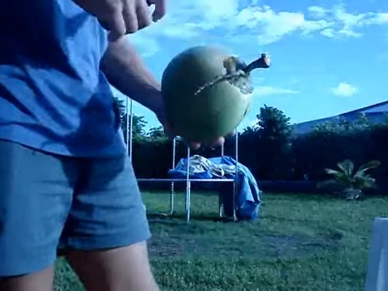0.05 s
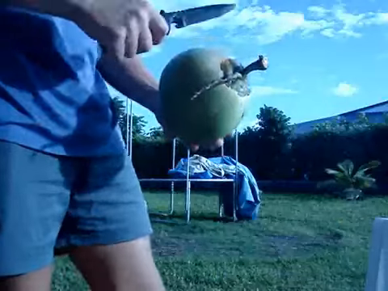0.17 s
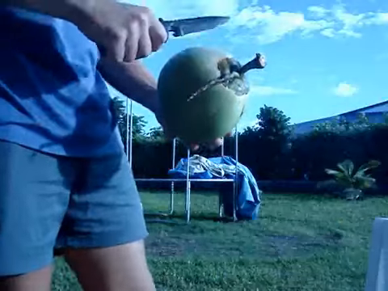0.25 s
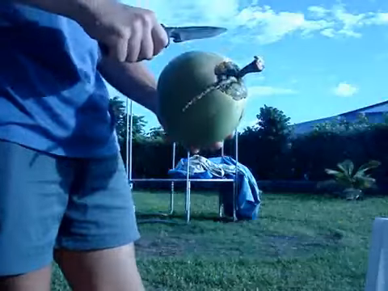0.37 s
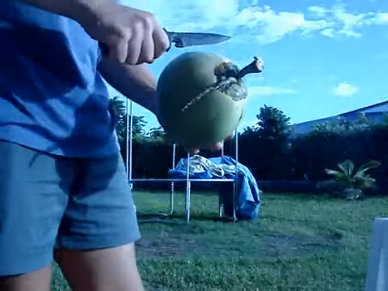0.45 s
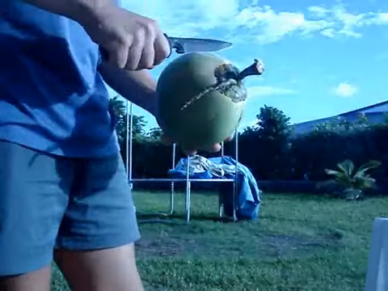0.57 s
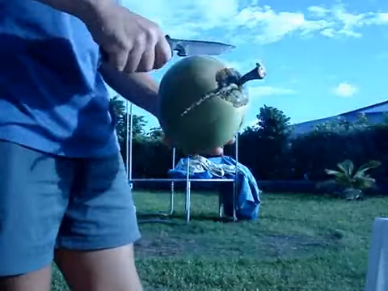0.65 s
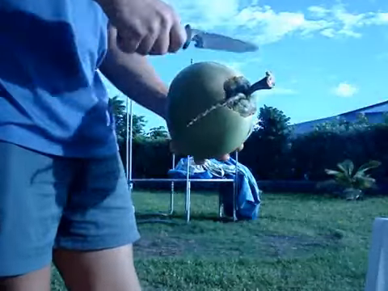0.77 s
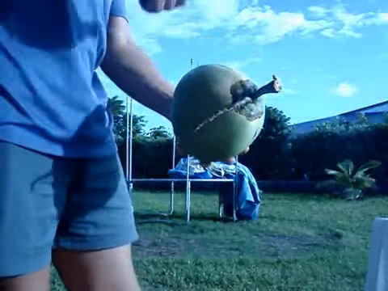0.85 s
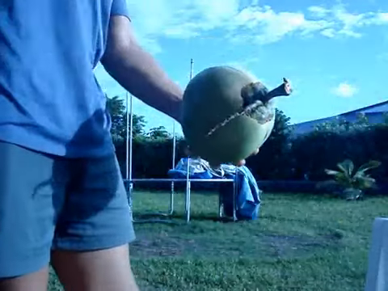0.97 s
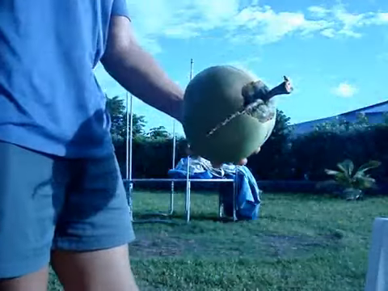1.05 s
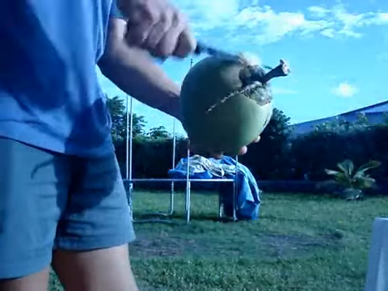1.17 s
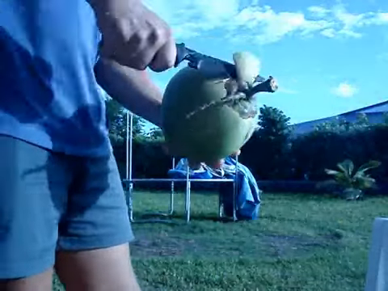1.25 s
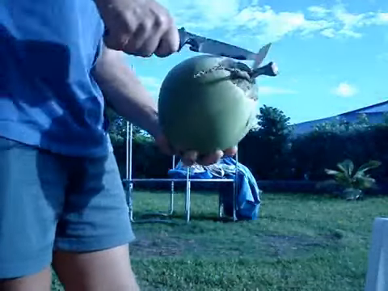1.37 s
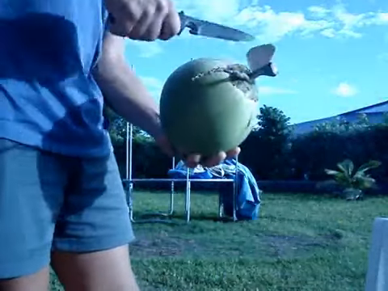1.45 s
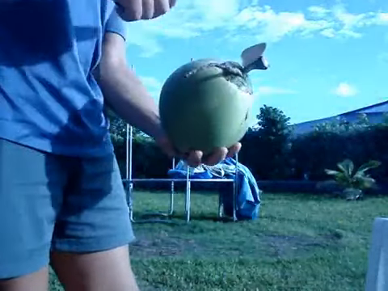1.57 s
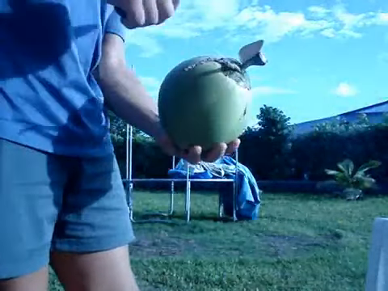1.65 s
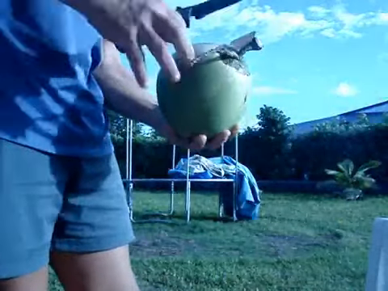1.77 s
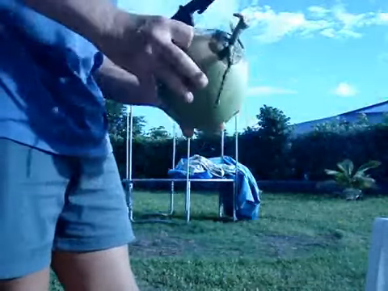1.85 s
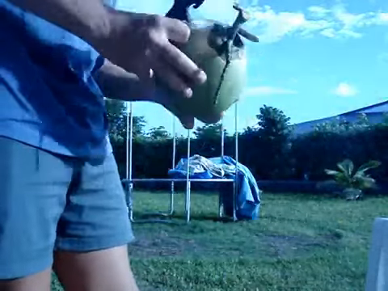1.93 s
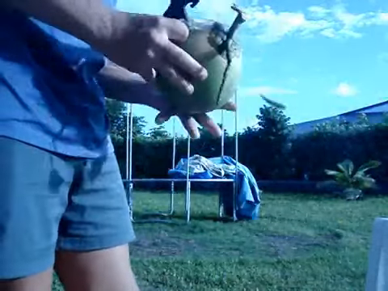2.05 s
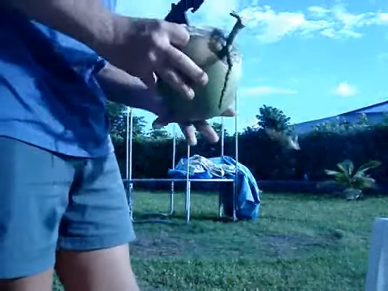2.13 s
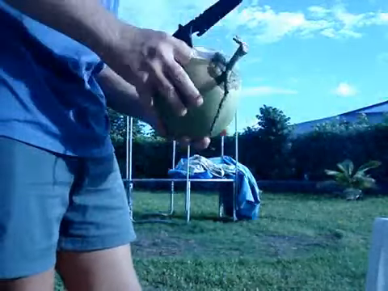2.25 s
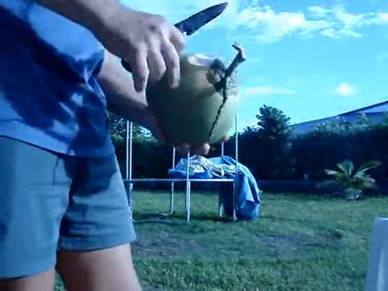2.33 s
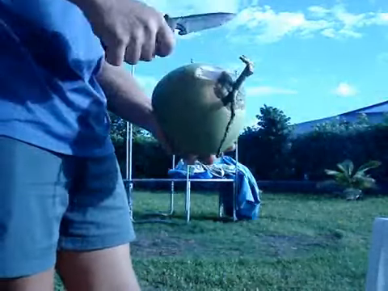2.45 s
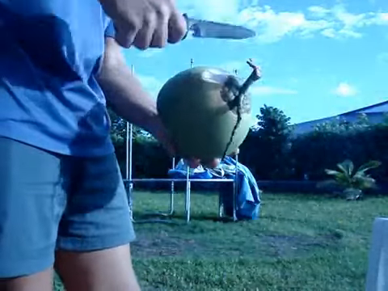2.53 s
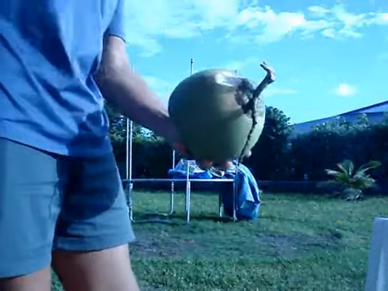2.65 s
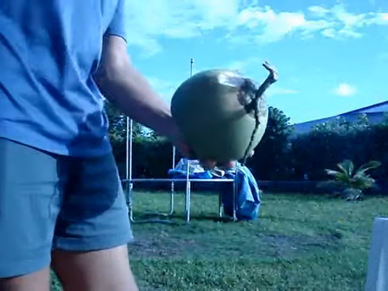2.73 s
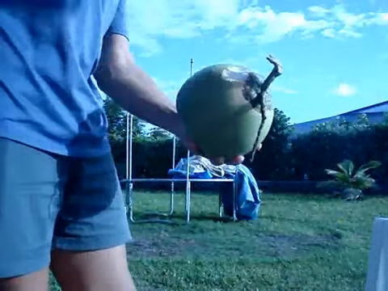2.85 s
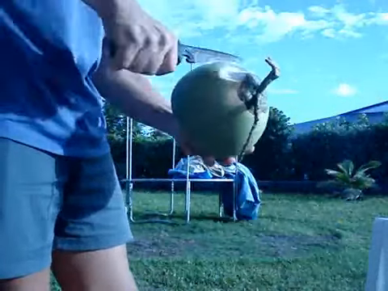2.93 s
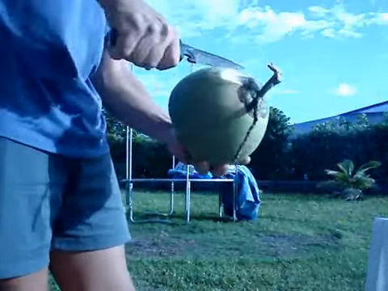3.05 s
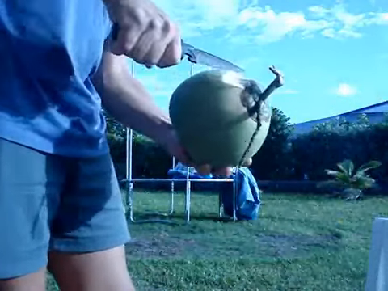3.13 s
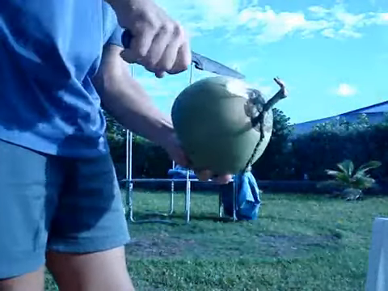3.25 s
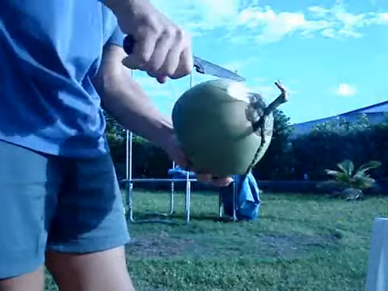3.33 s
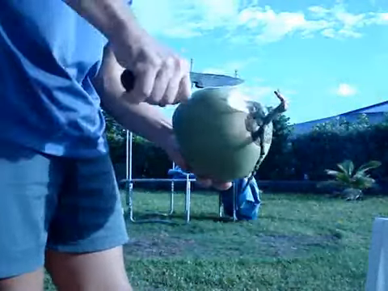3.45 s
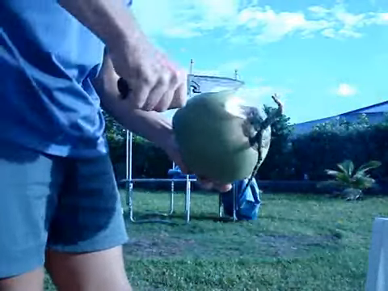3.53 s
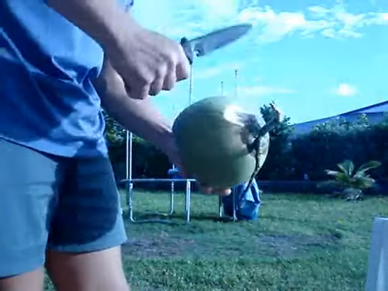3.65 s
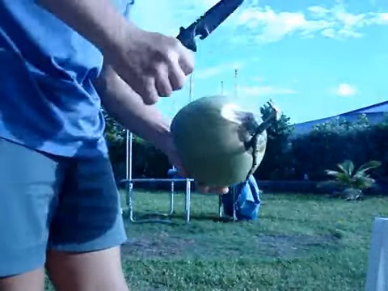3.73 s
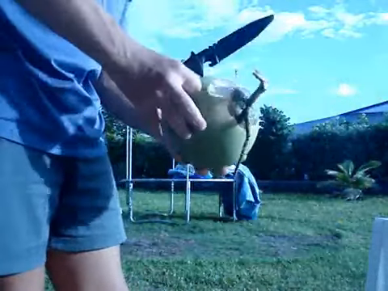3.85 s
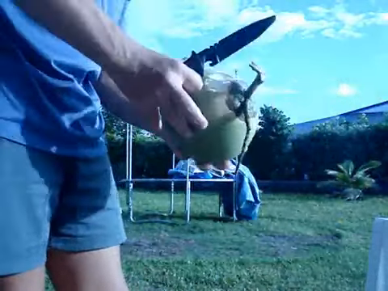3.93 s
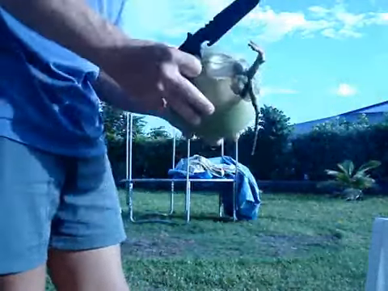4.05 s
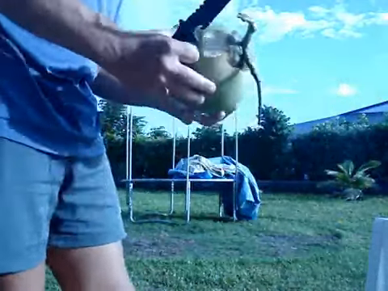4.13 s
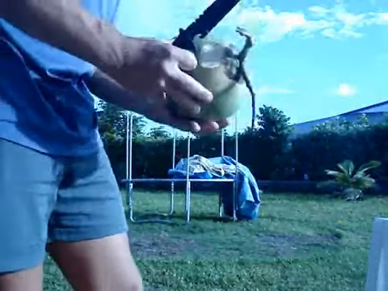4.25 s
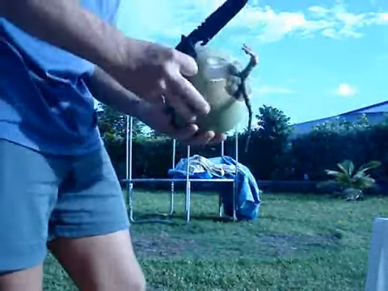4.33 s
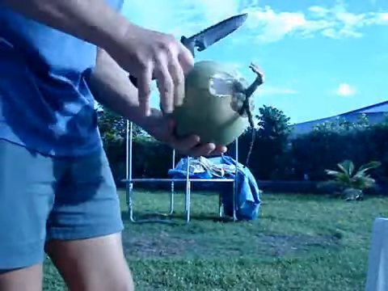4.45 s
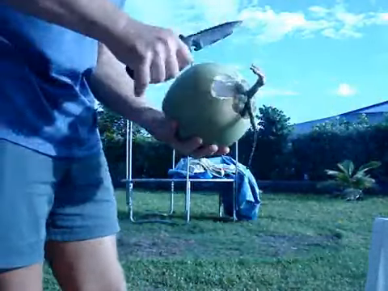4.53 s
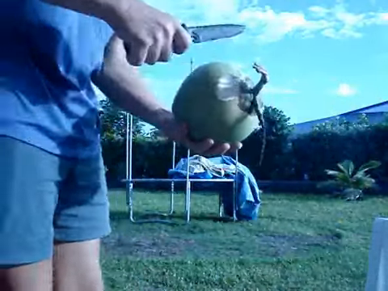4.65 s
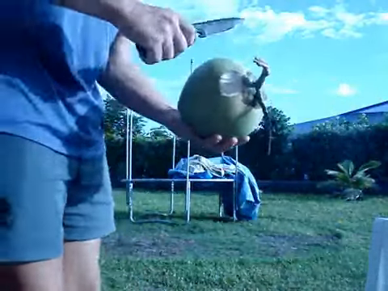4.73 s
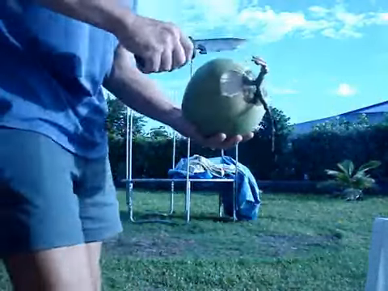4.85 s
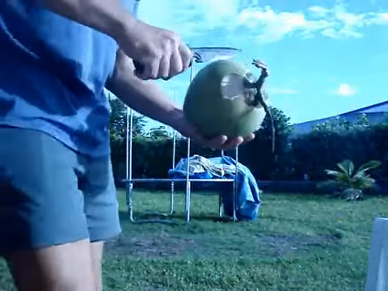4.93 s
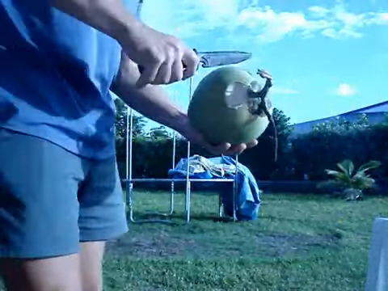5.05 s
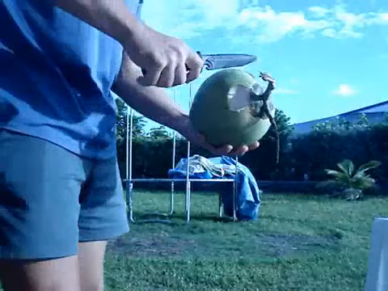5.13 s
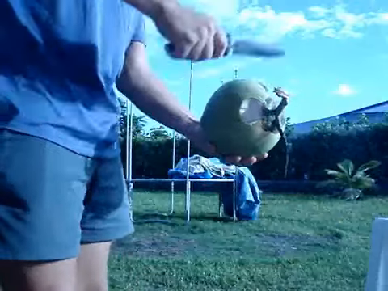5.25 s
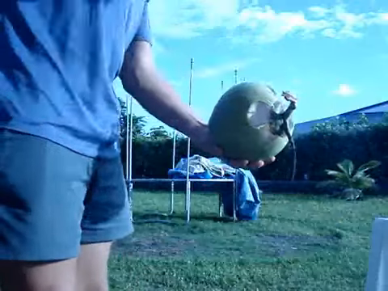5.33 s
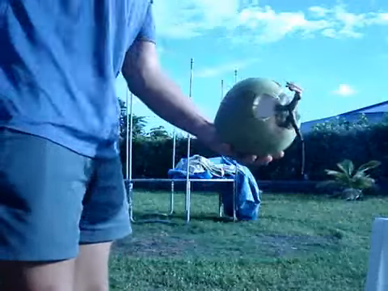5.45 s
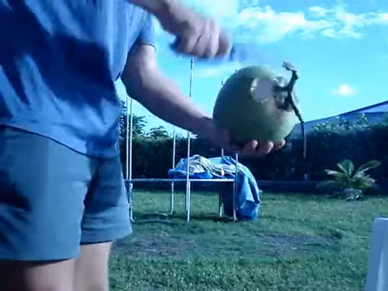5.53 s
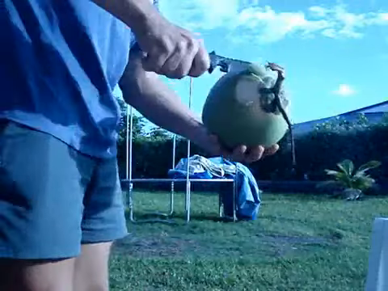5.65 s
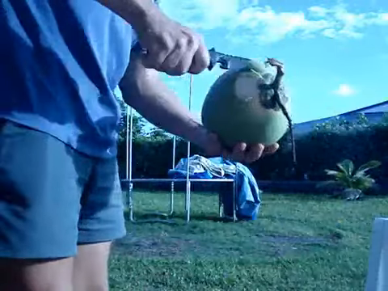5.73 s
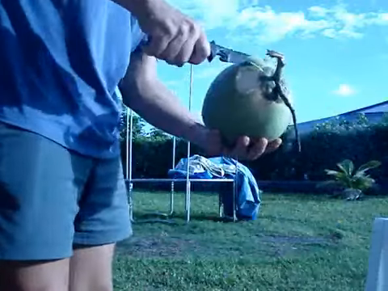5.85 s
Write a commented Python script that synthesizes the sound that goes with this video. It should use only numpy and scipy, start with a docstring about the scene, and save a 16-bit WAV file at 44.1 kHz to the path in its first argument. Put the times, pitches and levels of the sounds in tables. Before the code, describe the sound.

Three sharp knife chops crack into a green coconut outdoors, with a light double tick between two of them, over steady soft hiss.

```python
"""In a garden, a knife chops three times into a green coconut held in one hand; a light double tick falls
between two of the blows, and a shirt brushes softly before the last one.
Each chop is a crack, two close reflections of it and a short tear of fibres; the husk, split and steel ring.
Walls and hedges scatter the blows back as fading noise. Steady hiss and a faint whine lie underneath.
One microphone: both channels are the same."""
import sys
import numpy as np
from scipy import signal
from scipy.fft import rfft, irfft, next_fast_len
from scipy.io import wavfile

SR = 44100
rng = np.random.default_rng(int(sys.argv[2]) if len(sys.argv) > 2 else 0)


def digitize_waveform(pressure):
    """Quantize a signal to 16-bit integers and store it at the path in sys.argv[1].

    Rows of a 2-D input are taken as channels; values are limited to [-1, 1].
    """
    field = np.atleast_2d(pressure).T
    bounded = np.clip(field, -1, 1)
    quanta = np.round(bounded * 32767).astype(np.int16)
    wavfile.write(sys.argv[1], SR, quanta)


N = 259749   # length of the scene in samples
KNIFE_DB = 8   # added to the levels of all chops and ticks
BLOW_SIZE = 4096   # samples kept for one burst of a chop or one tick


def from_db(db):
    """Turn decibels into a plain gain."""
    return 10 ** (np.asarray(db) / 20)


def unit_energy(x):
    """Scale a sound so that its squared samples add up to 1."""
    return x / np.sqrt(np.sum(x ** 2) + 1e-20)


def at_hz(points, hz):
    """Read a table between its points, along a logarithmic pitch axis."""
    knots, values = np.transpose(points)
    return np.interp(np.log(np.maximum(hz, 1)), np.log(knots), values)


def add(out, start_s, sound):
    """Mix a sound in at a given time."""
    start = round(start_s * SR)
    out[start:start + len(sound)] += sound[:N - start]


def steady_noise(spectrum):
    """Noise of a given colour, with an rms level of 1."""
    gains = from_db(at_hz(spectrum, np.fft.rfftfreq(N, 1 / SR)))
    white = rfft(rng.standard_normal(N))
    return np.sqrt(N) * unit_energy(irfft(white * gains, N))


def colour(x, spectrum):
    """Filter with a given dB curve that reacts as early as it can (minimum phase)."""
    size = next_fast_len(2 * len(x))
    size += size % 2
    gains = from_db(at_hz(spectrum, np.fft.rfftfreq(size, 1 / SR)))
    # folding the cepstrum forward in time keeps the filter from sounding before its input
    cepstrum = irfft(np.log(gains))
    cepstrum[1:size // 2] *= 2
    cepstrum[size // 2 + 1:] = 0
    response = np.exp(rfft(cepstrum))
    return irfft(rfft(x, size) * response)[:len(x)]


def resonate(x, hz, width_hz):
    """One resonance with gain 1 at its peak; the narrower it is, the longer it rings."""
    r = np.exp(-np.pi * width_hz / SR)
    feed = np.array([1, 0, -1]) * (1 - r * r) / 2
    feedback = [1, -2 * r * np.cos(2 * np.pi * hz / SR), r * r]
    return signal.lfilter(feed, feedback, x)


def ring(x, modes):
    """Resonances side by side, added with alternating signs."""
    total = 0
    for k, (hz, width_hz, db) in enumerate(modes):
        total = total + (-1) ** k * from_db(db) * resonate(x, hz, width_hz)
    return total


def background(hiss_db=-50, waver_db=0.07):
    """Even hiss of open air and microphone, barely wavering, plus the thin electronic whine of steady tones."""
    # colour of the hiss: pitch_hz [Hz], density_db [dB per Hz]
    hiss_colour = [(20, -21), (45, -10.5), (100, -4.5), (190, -1.5), (400, -1), (1000, -4), (2000, -9),
                   (4600, -15), (5700, -15), (6800, -19), (8200, -20.5), (9700, -23.5), (10400, -29.5),
                   (11000, -35)]
    # faint electronic tones: pitch_hz [Hz], level_db [dB rms]
    whine_tones = [(8000, -81), (8123, -75.5)]
    t = np.arange(N) / SR
    knots = np.arange(0, 6.2, .15)   # a new random level every 0.15 s
    waver = np.interp(t, knots, rng.standard_normal(len(knots)))
    hiss = from_db(hiss_db + waver_db * waver) * steady_noise(hiss_colour)
    whine = sum(np.sqrt(2) * from_db(db) * np.sin(2 * np.pi * hz * t) for hz, db in whine_tones)
    return hiss + whine


def crunch(length_s, per_s, spread_db, fade_s):
    """Random snaps of uneven strength, steady for a given length and then dying away."""
    t = np.arange(BLOW_SIZE) / SR
    snaps = (rng.random(BLOW_SIZE) < per_s / SR) * rng.choice([-1, 1], BLOW_SIZE)
    sizes = from_db(spread_db * rng.standard_normal(BLOW_SIZE))
    fade = np.exp(-np.maximum(t - length_s, 0) / fade_s)
    return unit_energy(snaps * sizes * fade)


def burst(modes, length_s, split_hz, split_db, knock_db, treble_db):
    """One burst of a chop: a click rings the whole nut, a crunch stirs mainly its upper modes and the split."""
    # colour of the snapping fibres: pitch_hz [Hz], density_db [dB per Hz]
    fibre_colour = [(60, -21), (200, -9), (500, -16.5), (1500, -4), (3000, -7), (5000, -8.5), (6200, -15.5),
                    (7500, -12.5), (9700, -17.5), (11500, -31.5)]
    click_db, crunch_db = -1, -3
    fibre_low_hz = 1000   # below this the crunch moves the nut less and less
    split_width = 0.25   # width of the split's resonance as a share of its pitch

    click = signal.unit_impulse(BLOW_SIZE)
    fibres = crunch(length_s, per_s=8000, spread_db=2.5, fade_s=0.0021)
    high_pass = signal.butter(1, fibre_low_hz, "high", fs=SR, output="sos")
    fine = signal.sosfilt(high_pass, fibres)
    drive = from_db(click_db) * click + from_db(crunch_db) * fine
    knock = from_db(knock_db) * ring(drive, modes)
    split = from_db(split_db) * resonate(drive, split_hz, split_width * split_hz)
    snap = from_db(treble_db) * colour(0.16 * click + fibres, fibre_colour)
    return knock + split + snap


def chops():
    """Each chop is a crack of the rind, two close reflections of it, then a short tear of fibres."""
    # nut and blade ringing together; where the blade lands sets each mode's strength. The last two rows are
    # the steel, which sings on: pitch_hz [Hz], width_hz [Hz], first_db, second_db, third_db [dB in each chop]
    husk_modes = [(384, 110, -2, 1.5, -1.5), (612, 52, 10, 2.5, 2), (736, 100, 2.5, 1, 1.5),
                  (982, 51, 7.5, -2, 4.5), (1210, 147, 3, 3.5, 4.5), (1375, 97, 3, -4, 13),
                  (1670, 28, -22, -6, 3), (1937, 44, 6, 4.5, 13.5), (2166, 110, 2.5, 6, 7.5),
                  (2660, 120, 4.5, 10, -5), (2900, 95, -30, -12, -11.5), (3530, 55, -13, -11, -12),
                  (3800, 95, -3, -3, 2), (4730, 140, -4.5, 1.5, -7), (1166, 10, -6, 10, 10),
                  (2400, 7.3, -1, 14, -8)]
    # one row a chop: start_s [s], level_db [dB before KNIFE_DB], split_hz [Hz], knock_db [dB], treble_db [dB],
    # echo_delay_s [s], echo_db [dB], tear_db [dB], tear_hz [Hz, pitch of the tear]
    chop_table = [(1.3510, -1, 2250, 1, 2.5, 0.0088, -3.5, -4.5, 4450),
                  (3.0924, 1.5, 2710, -2.5, 1, 0.011, -3, -17, 3400),
                  (5.7608, 1.5, 1830, -1.5, 1.5, 0.0092, -3.5, -17, 1900)]
    # how long each crunch lasts, in seconds, before it fades
    crack_s, near_s, echo_s, tear_s = 0.0032, 0.0029, 0.005, 0.006
    # how strongly the split rings in each burst, in dB
    crack_split_db, near_split_db, echo_split_db, tear_split_db = 3.5, 2.5, 2.5, 6.5
    # first near reflection of the crack: about 3 ms later and duller
    near_delay_s, near_db, near_hz, near_treble_db = 0.003, -2, 1250, -4
    # second reflection, from wall or ground: about 10 ms after the crack and slightly higher
    echo_pitch_ratio = 1.06
    tear_delay_s, tear_knock_db, tear_treble_db = 0.0152, -2, -6   # tearing knocks the nut less

    out = np.zeros(N)
    for k, row in enumerate(chop_table):
        start_s, level_db, split_hz, knock_db, treble_db, echo_delay_s, echo_db, tear_db, tear_hz = row
        modes = [(hz, width_hz, strengths[k]) for hz, width_hz, *strengths in husk_modes]
        # each reflection is a new burst with its own random crunch
        crack = burst(modes, crack_s, split_hz, crack_split_db, knock_db, treble_db)
        near = burst(modes, near_s, near_hz, near_split_db, knock_db, treble_db + near_treble_db)
        echo = burst(modes, echo_s, split_hz * echo_pitch_ratio, echo_split_db, knock_db, treble_db)
        tear = burst(modes, tear_s, tear_hz, tear_split_db, knock_db + tear_knock_db,
                     treble_db + tear_treble_db)
        bursts = [(0, 0, crack),
                  (near_delay_s, near_db, near),
                  (echo_delay_s, echo_db, echo),
                  (tear_delay_s, tear_db, tear)]
        for delay_s, burst_db, sound in bursts:
            add(out, start_s + delay_s, from_db(KNIFE_DB + level_db + burst_db) * sound)
    return out


def garden(x, wet_db=-5, first_s=0.011, hold_s=0.043, lumps_db=2.5):
    """Walls and hedges return each band's energy as a diffuse wash: fairly even at first, then dying away."""
    # strength of the scatter: pitch_hz [Hz], level_db [dB before wet_db]
    scatter = [(100, -2), (330, 5), (600, -2), (1100, -5), (2400, -6.5), (4000, -7), (7000, -8),
               (11000, -6.5)]
    # time the scatter takes to fall by 60 dB: pitch_hz [Hz], t60_s [s]
    scatter_t60 = [(200, 0.32), (1200, 0.29), (2500, 0.36), (5000, 0.38), (10000, 0.33)]
    t = np.arange(SR * 6 // 10) / SR
    edges = np.geomspace(80, 12000, 15)   # band limits in Hz
    white = rng.standard_normal((2, N))   # neighbouring bands get unrelated noise
    knots = np.linspace(0, t[-1], 120)
    lumps = from_db(lumps_db * np.interp(t, knots, rng.standard_normal(len(knots))))   # uneven reflections
    arrivals = np.clip((t - first_s) / 0.014, 0, 1) * lumps   # swells in over 14 ms

    out = np.zeros(N)
    for k, (low, high) in enumerate(zip(edges, edges[1:])):
        hz = np.sqrt(low * high)
        band = signal.butter(2, [low, high], "band", fs=SR, output="sos")
        fade = np.exp(-np.log(1000) * np.maximum(t - hold_s, 0) / at_hz(scatter_t60, hz))
        # the trace of noise keeps the filter from working on pure silence
        sent = signal.sosfilt(band, x + 1e-18 * white[0]) ** 2
        spread = unit_energy(arrivals * fade) ** 2
        returned = np.maximum(signal.oaconvolve(sent, spread)[:N], 0)
        wash = np.sqrt(N) * unit_energy(signal.sosfilt(band, white[k % 2]))
        out += from_db(wet_db + at_hz(scatter, hz)) * np.sqrt(returned) * wash
    return out


def ticks():
    """The edge grazes the hard rind: a tiny bright scrape that rings the rind but not the whole nut."""
    # light grazes: start_s [s], level_db [dB before KNIFE_DB], length_s [s]
    grazes = [(2.5927, -12, 0.0062), (2.6047, -12.5, 0.0045)]
    # resonances of the grazed rind: pitch_hz [Hz], width_hz [Hz], level_db [dB]
    rind_modes = [(1960, 450, -5.5), (2940, 220, 4), (3530, 220, 6.5), (4520, 400, -4), (5230, 310, 2),
                  (6530, 920, -5.5), (8700, 1100, -11)]
    out = np.zeros(N)
    for start_s, level_db, length_s in grazes:
        scrape = crunch(length_s, per_s=6600, spread_db=5, fade_s=0.0011)
        add(out, start_s, from_db(level_db + KNIFE_DB) * ring(scrape, rind_modes))
    return out


def sleeve():
    """The shirt brushes as the arm rises: cloth noise in a soft bell-shaped swell."""
    # brushes: peak_s [s], level_db [dB rms at the peak], length_s [s, from the peak down to 37 percent]
    brushes = [(5.264, -56.5, 0.042)]
    # colour of the cloth: pitch_hz [Hz], density_db [dB per Hz]
    cloth_colour = [(300, -20), (1500, 5), (4000, 4), (9000, -12), (12000, -26)]
    t = np.arange(N) / SR
    swell = sum(from_db(db) * np.exp(-((t - peak_s) / length_s) ** 2) for peak_s, db, length_s in brushes)
    return steady_noise(cloth_colour) * swell


def scene():
    """Knife, garden, shirt and background, the same in both channels."""
    knife = chops() + ticks()
    mono = knife + garden(knife) + sleeve() + background()
    return np.tile(mono, (2, 1))


def record(dry, cutoff_hz=11050):
    """A steep low-pass filter removes the top of the treble."""
    low_pass = signal.ellip(10, .2, 70, cutoff_hz, fs=SR, output="sos")   # 0.2 dB ripple, 70 dB cut
    return signal.sosfilt(low_pass, dry)


dry = scene()
out = record(dry)
digitize_waveform(out)
```